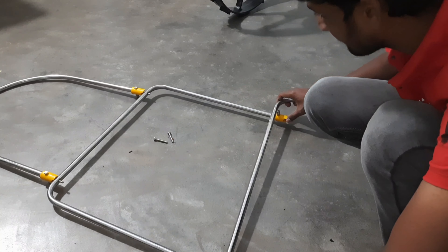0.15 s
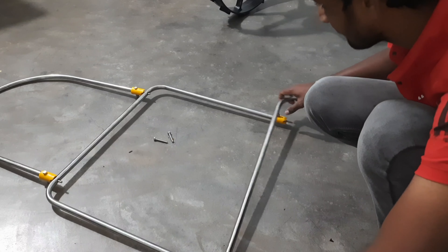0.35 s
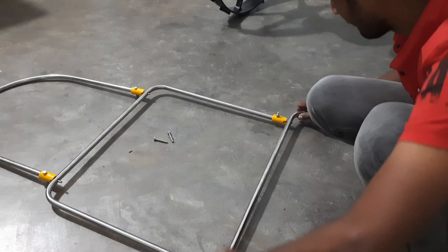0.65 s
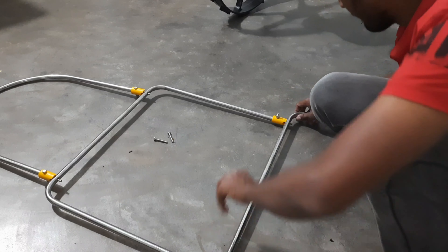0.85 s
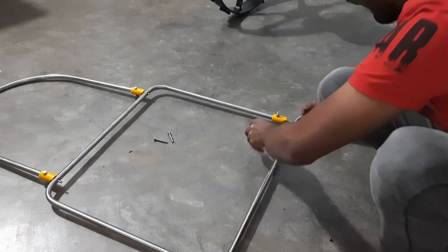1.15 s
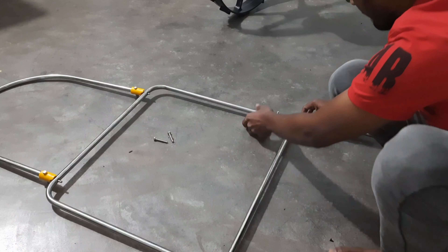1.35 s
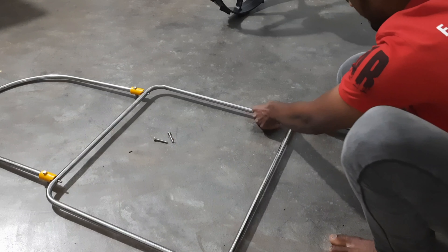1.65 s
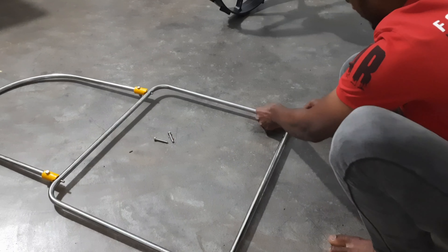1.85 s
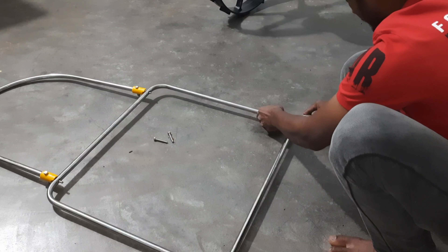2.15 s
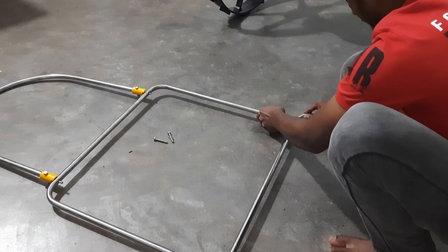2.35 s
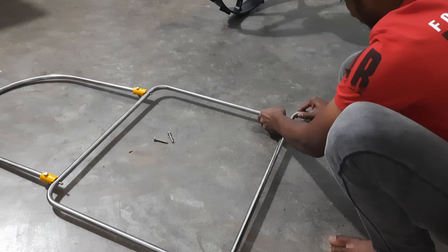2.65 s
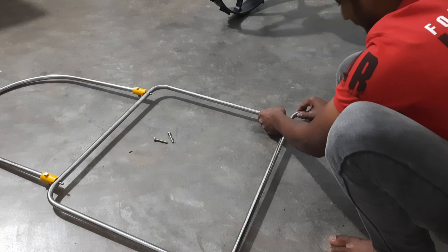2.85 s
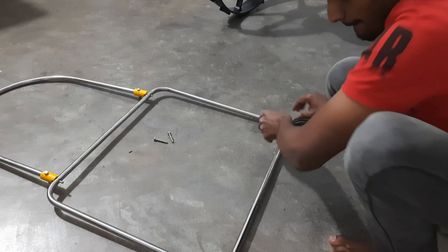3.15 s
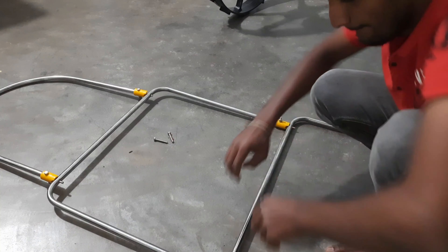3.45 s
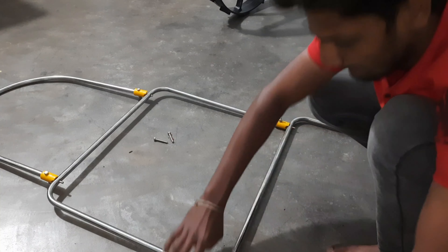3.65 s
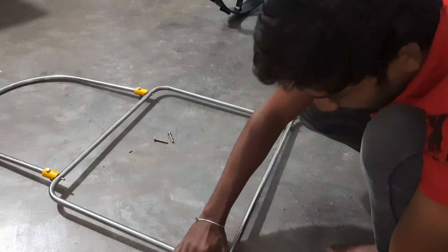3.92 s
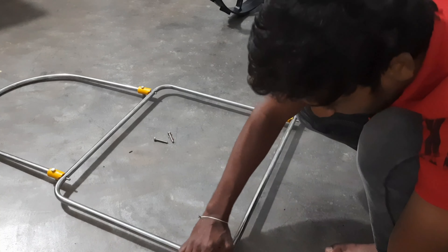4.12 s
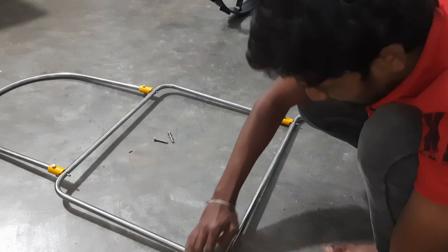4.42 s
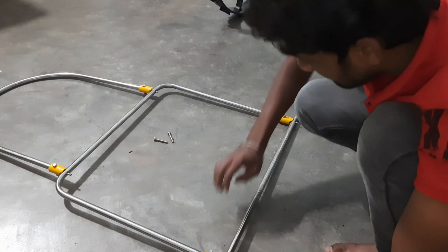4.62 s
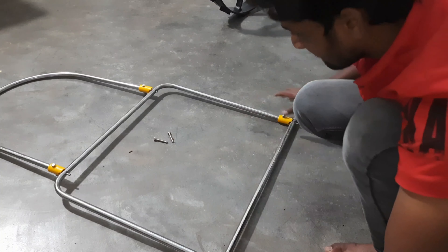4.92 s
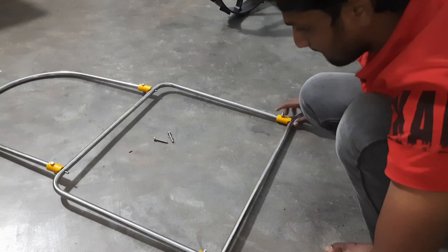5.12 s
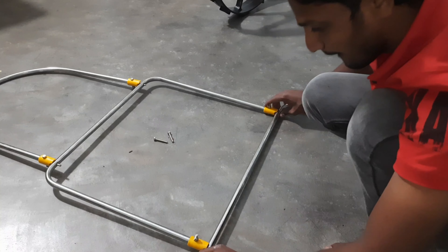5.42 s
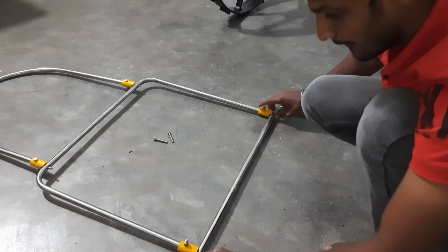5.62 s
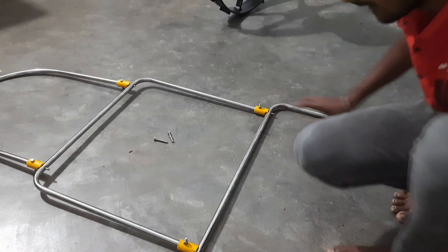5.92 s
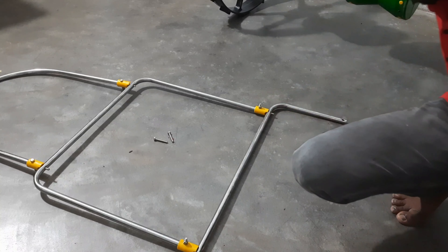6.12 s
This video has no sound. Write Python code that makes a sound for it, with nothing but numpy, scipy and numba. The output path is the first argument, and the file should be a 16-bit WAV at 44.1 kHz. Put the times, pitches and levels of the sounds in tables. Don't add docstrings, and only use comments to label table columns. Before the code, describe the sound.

Thin metal frames are assembled on a concrete slab, heard from a metre or two away. Gritty dragging opens, followed by one ringing blow, a light tap and a bright corner knock. Tubes push and click into plastic clamps with dull thuds, then a loud cluster of scraping, groaning and clattering. Low rubs and a last hard metallic clack follow, decaying into reverberant walls over faint deep traffic rumble.

```python
import sys
import numpy as np
from scipy import signal
from scipy.fft import rfft, irfft
from scipy.io import wavfile
from scipy.ndimage import uniform_filter1d
from numba import njit

SR = 44100
rng = np.random.default_rng(int(sys.argv[2]) if len(sys.argv) > 2 else 0)


def digitize_waveform(pressure):
    field = np.atleast_2d(pressure).T
    bounded = np.clip(field, -1, 1)
    quanta = np.round(bounded * 32767).astype(np.int16)
    wavfile.write(sys.argv[1], SR, quanta)


def undo_db(level):
    steps = np.asarray(level, float) / 20
    return 10 ** steps


N = 276942


def unit(x):
    return x / np.sqrt(np.mean(x ** 2))


def butter(x, order, hz, kind="low"):
    return signal.sosfilt(signal.butter(order, hz, kind, fs=SR, output="sos"), x)


def peak(x, hz, q):
    b, a = signal.iirpeak(hz, q, fs=SR)
    return signal.lfilter(b, a, x)


def colour(x, points, size=4096):
    hz, db = np.transpose(points)
    grid = np.maximum(np.arange(size // 2 + 1) * SR / size, 1)
    cep = irfft(np.interp(np.log(grid), np.log(hz), db) * np.log(10) / 20)
    cep[1:size // 2] *= 2
    cep[size // 2 + 1:] = 0
    response = irfft(np.exp(rfft(cep)))[:size // 2]
    return signal.fftconvolve(x, response / np.sqrt(np.sum(response ** 2)))[:len(x)]


def walk(rate):
    hold = int(SR / rate)
    steps = np.repeat(rng.standard_normal(N // hold + 1), hold)
    return unit(uniform_filter1d(steps, hold)[:N])


def swell(s, db, rise, fall):
    roundness = 1.2
    t = np.arange(N) / SR - s
    away = np.where(t < 0, -t / max(rise, 1e-3), t / max(fall, 1e-3))
    return undo_db(db - 20 * np.minimum(away, 8) ** roundness)


def slips(per_s, scatter_db, patchy_db):
    size_db = scatter_db * np.minimum(rng.exponential(size=N), 3)
    clicks = (rng.random(N) < per_s / SR) * rng.standard_normal(N) * undo_db(size_db)
    return unit(clicks) * undo_db(patchy_db * walk(40))


def push(s, ms):
    phase = (np.arange(64) + .5) / max(ms * SR / 1000, 1.)
    shape = np.sin(np.pi * np.clip(phase, 0, 1)) + 1e-9
    return int(s * SR) + np.arange(64), shape / shape.sum()


# f/Hz, level/dB per Hz
AIR = [(15, -16.5), (28, 2.5), (103, 2), (202, -3.5), (522, -8), (1590, -32), (2080, -26.5), (3400, -38.5),
       (3790, -45), (8790, -40), (10100, -35), (14300, -38.5), (16400, -65)]


def hum():
    mid, side = (colour(rng.standard_normal(N), AIR) for _ in range(2))
    side = butter(side, 1, 250, "high")
    return undo_db(-52.5 + 2.5 * walk(0.15)) * (mid + side * np.array([[1], [-1]]))


# t/s of the peak, level/dB, rise/s, fall/s
TRAFFIC = [
    (0.01, -47, 0.26, 2.8),
    (1.549, -54.5, 0.33, 0.29),
    (2.47, -42, 0.34, 0.84),
    (3.391, -34, 0.66, 0.16),
    (3.759, -43, 0.16, 0.58),
    (4.18, -75.5, 0.2, 0.45),
    (4.829, -41.5, 0.15, 0.33),
    (5.402, -43.5, 0.19, 0.41),
]


def outside():
    drone = unit(butter(rng.standard_normal(N), 2, [62, 88], "band"))
    return sum(swell(*row) for row in TRAFFIC) * drone


# t/s of the peak, grind level/dB, rise/s, fall/s, grit above grind level/dB
SHOVES = [
    (0.002, -17, 0.039, 0.03, 2),
    (.094, -17, 0.065, 0.056, -0.5),
    (0.446, -39.5, 0.004, 0.22, -11),
    (2.573, -23, 0.0076, 0.11, -4),
    (3.929, -17, 0.035, 0.11, -7.5),
    (4.154, -12, 0.014, 0.044, -9),
    (4.205, -10.5, 0.045, 0.079, -12),
]
TWISTS = [
    (3.007, -21, 0.0046, 0.13, -16),
    (3.252, -19.5, 0.035, 0.13, -37),
]
SLIDES = [(.15, -41, 0.043, 0.051, -2), (1.03, -53, 0.075, 0.73, -10), (1.135, -42.5, 0.15, 0.028, 4.5),
          (1.231, -33.5, 0.0057, 0.1, -15), (1.4, -56.5, 0.14, 0.19, 10), (1.801, -53, 0.025, 1, -11),
          (1.888, -51.5, 0.0099, 0.099, 10.5), (2.12, -54.5, 0.25, 0.026, 5),
          (3.47, -66.5, 0.17, 0.059, 22.5), (3.75, -70, 0.354, 0.22, 13.5), (3.86, -59.5, 0.11, .01, 8.5),
          (4.72, -33.5, 0.058, 0.016, -3.5), (5.65, -34.5, 0.11, 0.01, 1.5), (5.9, -31, 0.098, 0.17, -27),
          (6.07, -42.5, 0.36, 0.04, -0.5), (6.19, -68, 0.061, 0.015, 28)]
SQUEALS = [
    (1.95, -51.5, 0.081, 0.02, 8.5),
    (5.181, -49.5, 0.0045, 0.24, 11.5),
    (5.265, -27, 0.027, 0.32, -19),
    (5.408, -29, 0.15, 0.031, -3),
]
JOLTS = [
    (2.661, -22.5, 0.11, 0.051, -25.5),
    (4.025, -21, 0.0059, 0.068, -2.5),
    (4.052, -9.5, 0.024, 0.035, -9.5),
]
# whistle above grit level/dB, ring above grind level/dB, rumble above grind level/dB
STROKE_KINDS = [
    (-13, -10, -14),
    (-8, -5, -11.5),
    (-17.5, -6, -10),
    (-1.5, -7, -6),
    (-15, -5, -11.5),
]
STROKE_PLACE = [
    4,
    8,
    2,
    2,
    7,
]


def strokes():
    out, rub = np.zeros((4, N)), np.zeros((9, N))
    tables = (SHOVES, TWISTS, SLIDES, SQUEALS, JOLTS)
    for table, (whistle_db, ring_db, rumble_db), place in zip(tables, STROKE_KINDS, STROKE_PLACE):
        for *shape, grit_db in table:
            effort = swell(*shape)
            out += effort * undo_db([[0], [grit_db], [grit_db + whistle_db], [rumble_db]])
            rub[place] += effort * undo_db(ring_db) * (effort > 1e-5)
    return out, rub


# f/Hz, level/dB per Hz
GRIND = [(290, -40.5), (500, 0.5), (725, -14), (903, -3), (1450, -13.5), (1670, -5.5), (2850, -5.5),
         (3470, -8.5), (8000, -26.5), (10400, -37), (17600, -120)]
GRIT = [(1500, -5), (4000, 3), (6410, 3), (8800, 5.5), (10000, 0), (11300, -3), (13400, -2.5),
        (15000, -5.5), (15900, -11), (16400, -73.5)]


def dragging(grind, grit, whistle):
    whistle_hz, width_hz = 11220, 440
    edges = [whistle_hz - width_hz / 2, whistle_hz + width_hz / 2]
    sing = unit(butter(slips(3000, 2.0, 2.5), 2, edges, "band"))
    coarse = colour(undo_db(-4.0) * grind * slips(6000, 6.1, 2.0), GRIND)
    fine = colour(undo_db(-5.0) * grit * slips(7800, 3.6, 2.5), GRIT)
    return coarse + fine + undo_db(-0.5) * whistle * sing


# t/s of the peak, level/dB, rise/s, fall/s
SHIFTS = [(0.131, -22.5, 0.8, 0.11), (0.718, -31.5, 0.17, 0.15), (1.12, -37.5, 0.08, 0.011),
          (1.96, -47, 0.32, 1), (2.68, -36.5, 0.3, 0.2), (3.32, -35.5, 0.039, 0.24),
          (3.75, -50, 0.26, 0.54), (4.24, -38.5, 0.058, 0.028), (4.75, -39.5, 0.24, 0.38),
          (5.301, -27.5, 0.12, 0.27), (5.85, -39.5, 0.18, 0.15)]


def shifting(blows):
    rise, fall = 0.021, 0.1
    lean = sum(swell(*row) for row in SHIFTS)
    return lean + sum(swell(s + rise, thud_db + 1, rise, fall) for _, s, _, _, thud_db, _ in blows)


# f/Hz, level/dB per Hz
SLAB = [(60, -15.5), (95, -7), (130, -3), (250, 1.5), (500, -3.5), (900, -6.5), (1200, -6.5), (2600, -40.5)]
# f/Hz, width/Hz, level/dB
FRAME = [(141.6, 16.3, 2.5), (247, 36, -8.5), (317.4, 120, -15.5), (378.5, 14, -15), (499, 12, -5.5),
         (850, 13, -24.5), (936, 7.2, -26), (1123, 39, -13.5)]


def slab(thud, load):
    shake = thud + undo_db(-7.0) * load * slips(2500, 2.64, 2.61)
    frame = sum(undo_db(db) * peak(shake, hz, hz / width) for hz, width, db in FRAME)
    return colour(shake, SLAB) + undo_db(23.0) * frame


# t/s, ring level/dB, crack level/dB, thud level/dB, damping by hand and floor after
LONG_SIDE = [
    (0.6188, -2, -2.5, -41.5, 1.94),
    (.6847, -16.5, -10, -55.5, 1.45),
]
CORNER = [
    (1.7789, -51, -62, -66, 2.2),
    (2.163, -7.5, -2, -28, 1.8),
]
CLAMP_END = [(3.861, -50, -66, -46, 1.6), (3.8938, -22, -23, -46, 1.2), (3.9076, -25.5, -18.5, -42, 1.2),
             (5.1746, -60, -48, -42, 1.3), (5.1838, -62, -56, -43, 1.3), (5.1937, -70, -60, -65, 1.6),
             (5.228, -55, -48, -59, 1.3), (5.2585, -27, -35, -60, 1.54), (5.559, -39.5, -46, -43.5, 1.4),
             (5.5826, -40, -36, -39, 5.1), (5.6769, -3, -4.5, -35, 4.3), (5.7059, -5.5, -5, -49, 1.73),
             (5.954, -24, -29, -51, 3.7)]
ON_FLOOR = [
    (2.959, -30, -14, -36.5, 1.6),
    (3.0305, -27.5, -32, -27, 2.9),
    (3.229, -22, -8, -27.5, 1.8),
    (3.928, -17.5, -31, -26.5, 2.5),
    (4.2936, -40.5, 3.5, -31, 1.7),
    (4.6421, -13.5, -17, -37, 2.53),
    (5.6753, -40, 2, -28.5, 4),
]
SHORT_SIDE = [
    (0.4426, -33.5, -54, -41.5, 8.2),
    (4.1464, -17, -16, -30, 5.1),
    (4.1794, -8.5, -15.5, -25, 0.98),
    (4.187, -10, -16, -31.5, 2.3),
]
FINGER = [
    (1.2259, -22, -31, -47, 3.8),
]
JOINT = [
    (4.2938, -14.5, -3.5, -21.5, 1.7),
    (4.3175, -2.5, -5.5, -32, 3.9),
    (5.2543, -15, -31, -57, 3.7),
]
BRACE = [
    (2.567, -35, -17.5, -41.5, 1.1),
    (4.0192, -18, -21.5, -40.5, 1.3),
    (4.0452, -16, -11, -40, 2),
    (4.057, -13, -14.5, -41, 2.1),
]
CLAMP = [
    (2.9725, -13.5, -25, -44, 5),
    (3.2525, -12, -28, -46, 1.8),
    (3.2578, -26, -23, -55, 2),
    (3.2636, -31, -11, -42, 1.93),
]


def blows():
    places = (LONG_SIDE, CORNER, CLAMP_END, ON_FLOOR, SHORT_SIDE, FINGER, JOINT, BRACE, CLAMP)
    rows = [(place, *row) for place, table in enumerate(places) for row in table]
    return sorted(rows, key=lambda row: row[1])


@njit
def resonate(force, damping, wander, cos, sin, detune, loss, gain, ports):
    out, x, y = np.zeros((2, len(force))), np.zeros(len(cos)), np.zeros(len(cos))
    for i in range(len(force)):
        for place in range(len(gain)):
            if force[i, place] != 0:
                for k in range(len(x)):
                    x[k] += gain[place, k] * force[i, place]
        left, right = 0., 0.
        for k in range(len(x)):
            keep, bend = 1 - loss[k] * damping[i], detune[k] * wander[i]
            a, b = keep * cos[k] - bend * sin[k], keep * sin[k] + bend * cos[k]
            x[k], y[k] = a * x[k] - b * y[k] + 1e-18, b * x[k] + a * y[k]
            left += ports[0, k] * y[k] + ports[1, k] * x[k]
            right += ports[2, k] * y[k] + ports[3, k] * x[k]
        out[0, i], out[1, i] = left, right
    return out


TUBE_HZ = [1320, 1725, 2030, 2193, 2426, 2608, 2772, 2993, 3215, 3608, 3815, 4425, 4702, 5425, 5935, 6420,
           6788, 7343, 7680, 8008, 8605, 9265, 9460, 10228, 10575, 11725, 11343, 12522, 13291, 14169, 3075,
           11100, 12732, 14061, 14826, 15143]
TUBE_T60_S = [0.46, .3, 0.5, 0.57, 0.57, 0.52, .15, .21, 0.65, 0.45, 0.55, 0.42, .4, 0.55, 0.2, 0.29, 0.43,
              0.32, 0.41, 0.24, .5, 0.39, .37, .25, 0.38, .16, 0.084, .2, 0.22, .24, .16, .13, .3, .3, .3,
              .3]
LONG_SIDE_DB = [-15.5, 3.0, -22.0, 4.5, -33.5, -7.0, -10.0, -27.0, -2.5, 0.0, 0.5, -6.5, -7.0, -7.5, 1.5,
                -12.0, -1.0, -24.0, -14.5, -15.5, -11.5, -11.0, -20.5, -17.0, -12.5, -17.0, -19.0, -15.5,
                -18.0, -24.5, -28.5, -29.0, -26.5, -28.0, -28.5, -24.0]
CORNER_DB = [-16.0, -5.0, 0.0, -2.5, -28.5, -3.0, -8.5, -6.0, 1.0, -0.5, -1.5, -4.0, -7.0, -7.5, -1.0,
             -25.5, -5.5, -30.0, -18.5, -25.0, -17.0, -18.0, -16.0, -15.0, -15.5, -17.0, -12.5, -20.0,
             -28.0, -20.0, -7.0, -45.0, -29.0, -22.5, -22.0, -45.0]
CLAMP_END_DB = [-29.0, -14.0, -23.0, -11.5, -25.5, -14.5, -31.5, -9.5, -8.0, -5.0, 6.5, -0.5, -6.0, -8.0,
                -3.5, -15.5, 1.0, -32.5, -10.5, -5.0, -5.5, -20.5, -16.5, -8.5, -17.5, -13.5, -18.5, -21.0,
                -28.5, -22.0, -14.0, -27.5, -30.0, -28.5, -21.5, -37.5]
ON_FLOOR_DB = [-19.0, -1.5, -15.5, -7.5, -16.0, -33.5, -20.5, -12.0, -22.5, -15.5, 4.5, -4.0, -9.0, -15.5,
               -9.0, -25.5, -14.5, -31.0, -14.5, -23.0, -12.0, -21.5, -23.5, -22.0, -28.0, -26.0, -26.5,
               -22.5, -25.0, -29.0, -38.5, -29.5, -39.5, -45.0, -45.0, -36.0]
SHORT_SIDE_DB = [-15, -6.5, -8.5, -3.5, -4.5, -20.5, 3.5, -15, -11.5, -15, -14.5, -25.5, -20, -26.5, -17,
                 -15.5, -21, -22.5, -32.5, -39.5, -28.5, -20, -28.5, -33.5, -35.5, -28.5, -40, -41, -44.5,
                 -34.5, -9, -31, -39.5, -35.5, -37.5, -38]
FINGER_DB = [-5, 0, -12, -9.5, -28, -16, -18, -30, -28, -22, -34, -25, -30, -24, -33, -25.5, -21, -17, -28,
             -10, -26, -36, -37.5, -44, -40, -39.5, -46, -40, -40, -44, -25, -40, -44, -46, -46, -44]
JOINT_DB = [-27.5, -5.0, -17.5, -12.0, -20.0, -13.0, -24.5, -14.5, -11.0, -8.0, 6.5, -4.5, 0.0, -9.5, -0.5,
            -32.5, -5.0, -29.0, -19.5, -20.5, -12.5, -25.0, -21.0, -8.0, -23.0, -8.5, -15.5, -24.0, -33.0,
            -25.0, -14.0, -26.5, -30.5, -32.5, -30.5, -33.5]
BRACE_DB = [-13, -17, -3.5, -22, -9, -15, -3, -6, -11, -8, -16, -20, -24.5, -18.5, -16, -14, -17, -29, -28,
            -29.5, -30, -31, -27, -29, -28.5, -27, -35, -36.5, -41, -32, 7, -30, -39, -38.5, -37.5, -38]
CLAMP_DB = [-28.0, -17.0, -0.5, -8.0, -18.0, -13.5, -24.0, -13.5, -15.0, -22.5, 6.5, 1.0, -5.5, -9.5, 3.5,
            -20.5, -18.5, -45.0, -21.5, -28.0, -13.0, -24.5, -22.5, -23.5, -21.5, -28.0, -24.0, -32.5,
            -31.0, -30.0, -24.0, -29.5, -36.0, -38.0, -32.5, -45.0]
CONTACT_MS = [0.039, .047, 0.026, 0.068, 0.026, 0.028, 0.022, .03, .022]


def tubes(hits, rub):
    force, damping = 0.0089 * rub, np.ones(N)
    rattle = rng.standard_normal((len(hits), 4096)) * np.exp(-np.arange(4096) / SR / 0.06)
    for (place, s, ring_db, _, _, grip), shake in zip(hits, rattle):
        at, shape = push(s, CONTACT_MS[place])
        start = at[0]
        force[place, at] += undo_db(ring_db - 9.0) * shape
        force[place, start:start + 4096] += undo_db(ring_db - 47) * np.convolve(shake, shape)[:4096]
        quickening = np.minimum(0.33 + np.arange(N - start) / SR / 0.27, 2.2)
        damping[start:] = np.clip(grip, .3, 6) * quickening

    places_db = np.c_[LONG_SIDE_DB, CORNER_DB, CLAMP_END_DB, ON_FLOOR_DB, SHORT_SIDE_DB,
                      FINGER_DB, JOINT_DB, BRACE_DB, CLAMP_DB]
    hz, t60, places_db = (np.repeat(v, 3, axis=0) for v in (TUBE_HZ, TUBE_T60_S, places_db))
    chance = rng.random((len(hz), 4))
    plane = np.arange(len(hz)) % 3 - 1
    split = 0.0016 * (.5 + 1.4 * chance[:, 0]) * plane
    angle = 2 * np.pi * hz * (1 + split) / SR
    tilt_db = 1.5 * np.log2(np.maximum(hz / 4200, 1))
    gain = undo_db(places_db + (tilt_db - 12.4 * np.abs(plane))[:, None])
    gain *= np.sign(chance[:, 3:] - .5)
    lean = undo_db(6 * (chance[:, 1] - .5)) * np.exp(1.5j * (chance[:, 2] - .5))
    ports = np.array([lean.real, lean.imag, (1 / lean).real, (1 / lean).imag])
    loss = np.log(1000) / (t60 * SR)
    detune = 0.001 * angle * (1 + chance[:, 3]) * np.cos(np.pi * np.arange(len(angle)))
    return resonate(force.T.copy(), damping, walk(45), np.cos(angle), np.sin(angle),
                    detune, loss, gain.T.copy(), ports)


def flutter(ring):
    return ring + 1.17 * 0.35 * walk(250) * butter(ring, 2, 5960)


# f/Hz, level/dB per Hz
CRACK = [(240, -40), (400, -11.5), (900, -5), (1410, -1.5), (3690, 6), (5110, 5), (5970, 10), (7310, 9),
         (14700, -31), (16400, -30)]
CRACK_MS = [.031, 0.036, 0.023, 0.29, 0.038, .05, 0.03, 0.039, .03]


def knocks(hits):
    crack, thud = np.zeros(N), np.zeros(N)
    t = np.arange(2048) / SR
    chatter_decay = 0.49 * np.exp(-t / 0.0057) + 0.55 * np.exp(-t / 0.00085)
    chatter = rng.standard_normal((len(hits), 2, 2048))
    for (place, s, _, crack_db, thud_db, _), (a, b) in zip(hits, chatter):
        at, shape = push(s, CRACK_MS[place])
        span = slice(at[0], at[0] + 2048)
        burst = a * chatter_decay + 0.5 * (t == 0)
        crack[span] += undo_db(crack_db + 6.5) * np.convolve(burst, shape)[:2048]
        thud[span] += undo_db(thud_db + 5.5) * b * np.exp(-t / 0.0087)
    return colour(crack, CRACK), thud


# t/s of the peak, rise/s, fall/s, f/Hz
GROANS = [(.47, .03, .2, 300), (2.595, .04, .08, 430), (2.66, .06, .08, 537), (2.67, .12, .09, 2015),
          (2.67, .1, .08, 2245), (2.64, .1, .12, 2860), (2.71, .06, .08, 248), (3.96, .06, .1, 480),
          (4.06, .04, .14, 499), (4.09, .1, .15, 139), (4.21, .08, .14, 495), (4.22, .08, .1, 139),
          (4.2, .06, .1, 925), (5.24, .08, .15, 141), (5.37, .15, .2, 141), (5.36, .2, .25, 836),
          (5.38, .1, .12, 533), (5.33, .15, .2, 173), (5.72, .04, .25, 141), (4.19, .04, .08, 1200)]
GROAN_DB = [-50, -40, -38, -34, -40, -38, -39, -32, -29, -37, -25, -37, -40, -36, -35, -38, -38, -39, -35,
            -37]


def groans():
    rub = slips(3000, 2.0, 1.5)
    return sum(swell(s, db, rise, fall) * unit(peak(rub, hz, 25))
               for (s, rise, fall, hz), db in zip(GROANS, GROAN_DB))


# f/Hz, time to fall 60 dB t/s, left-right likeness (0 to 1)
ROOM = [(40, .7, .6), (97, 0.73, 0.72), (170, 0.46, 1), (352, 0.48, 0.72), (820, 0.51, 0.13),
        (1437, 0.56, 0.04), (4760, 0.46, 0.017), (12200, 0.41, 0.055)]


def room(x, size=30000):
    t, hz = np.arange(size) / SR, np.maximum(np.fft.rfftfreq(size, 1 / SR), 1)
    centres = np.log(np.array(ROOM)[:, 0])
    echo = np.zeros((2, size))
    for k, (_, t60, like) in enumerate(ROOM):
        share = np.interp(np.log(hz), centres, np.eye(len(ROOM))[k])
        mid, side = irfft(rfft(rng.standard_normal((2, size))) * share, size)
        both = np.sqrt(1 + like) * mid + np.sqrt(1 - like) * side * np.array([[1], [-1]])
        echo += both * np.exp(-np.log(1000) * t / t60) / np.sqrt(t60)
    echo *= np.clip((t - .002) / 0.0011, 0, 1)
    echo *= undo_db(3) / np.sqrt(np.sum(echo ** 2) / 2)
    return signal.fftconvolve(echo, x.mean(axis=0, keepdims=True), axes=1)[:, :N]


def scene():
    hits = blows()
    (grind, grit, whistle, rumble), rub = strokes()
    load = rumble + shifting(hits)
    crack, thud = knocks(hits)
    ring = flutter(tubes(hits, rub * slips(5000, 2.0, 4.5)))
    contact = slab(thud, load) + dragging(grind, grit, whistle) + groans()
    dull = butter(crack, 2, 4400)
    near = ring + crack + contact
    far = 0.72 * ring + dull + contact
    right_lag_s = .00007
    late = np.interp(np.arange(N) - right_lag_s * SR, np.arange(N), near[1])
    return undo_db(-5.0) * (np.array([near[0], late]) + room(far)) + hum() + outside()


def top_cut(x):
    return signal.sosfilt(signal.butter(12, 16570, fs=SR, output="sos"), x)


# f/Hz, level/dB
PORT_BALANCE = [(60, 5), (110, -2.5), (200, 1.5), (380, -1.5), (700, -0.5), (1290, 0), (2380, 1),
                (4400, -2), (8120, -4), (15000, 6.5)]


def record(dry):
    thin = butter(np.tanh(0.72 * dry) / 0.96, 2, 51, "high")
    low = signal.sosfilt(signal.ellip(8, .3, 50, 15200, fs=SR, output="sos"), thin)
    thin = low + undo_db(-34) * thin
    hz, lean_db = np.transpose(PORT_BALANCE)
    lean_db = np.interp(np.log(np.fft.rfftfreq(N, 1 / SR) + 1), np.log(hz), lean_db)
    mix = irfft(rfft(thin) * undo_db(lean_db * np.array([[.5], [-.5]])), N)
    return top_cut(np.clip(mix, -1, 1))


dry = scene()
out = record(dry)
digitize_waveform(out)
```